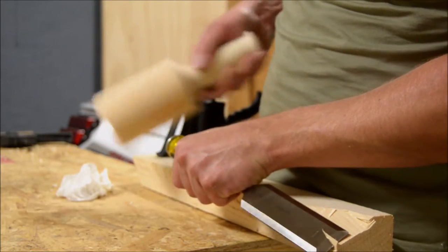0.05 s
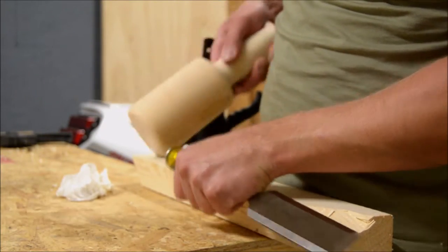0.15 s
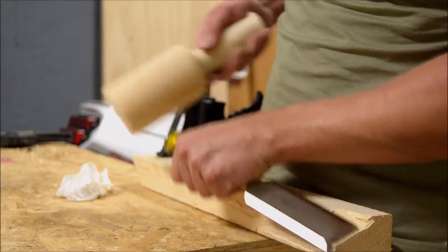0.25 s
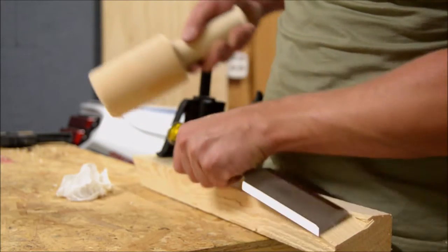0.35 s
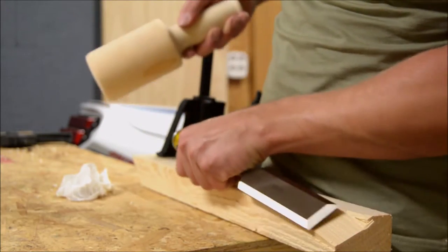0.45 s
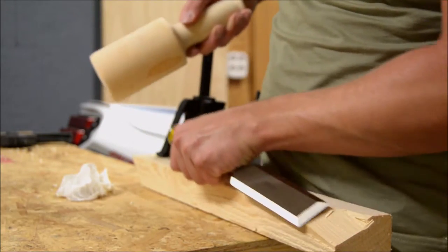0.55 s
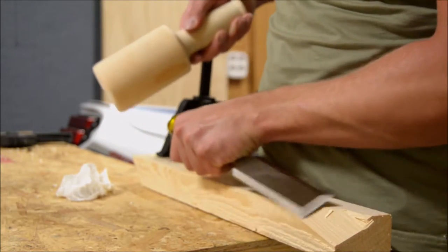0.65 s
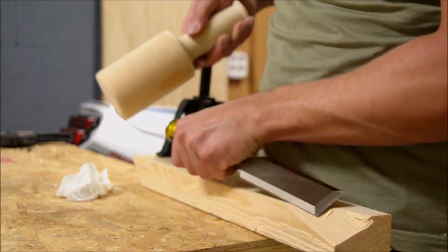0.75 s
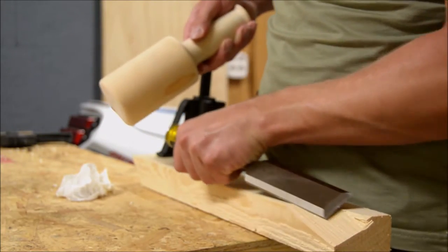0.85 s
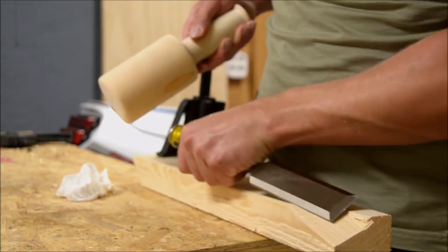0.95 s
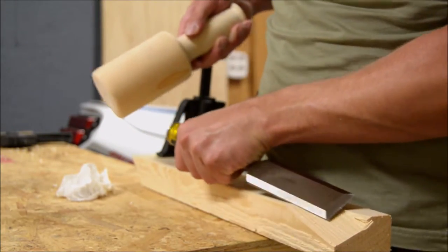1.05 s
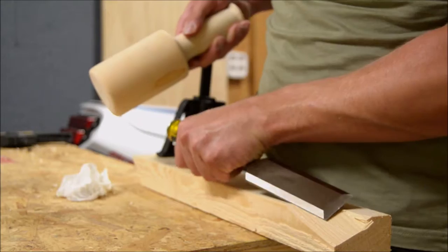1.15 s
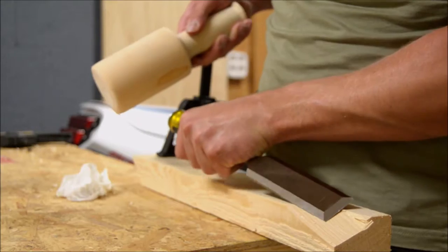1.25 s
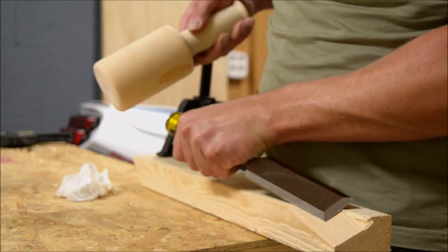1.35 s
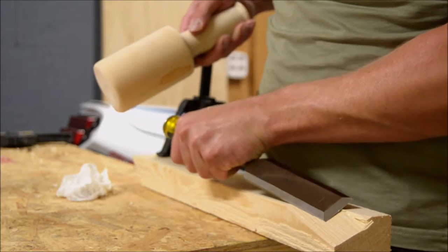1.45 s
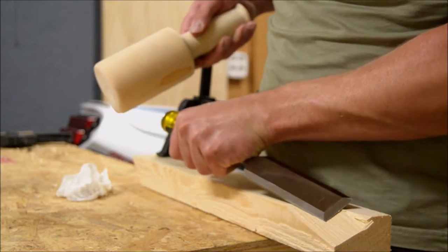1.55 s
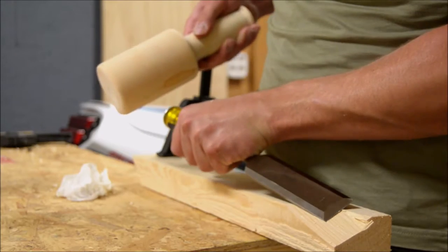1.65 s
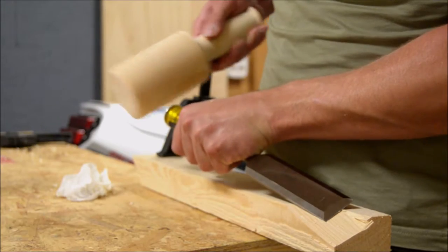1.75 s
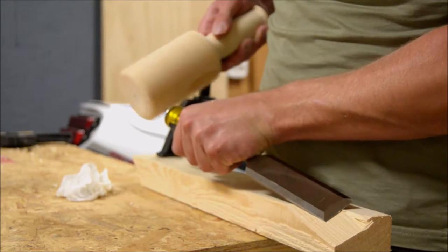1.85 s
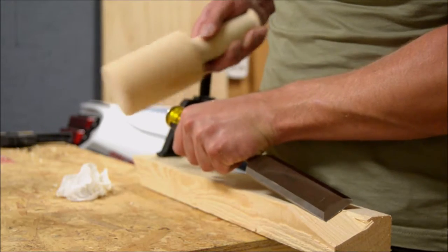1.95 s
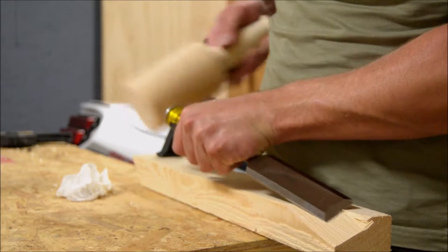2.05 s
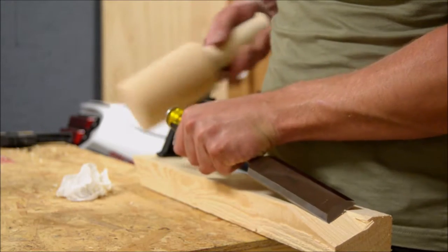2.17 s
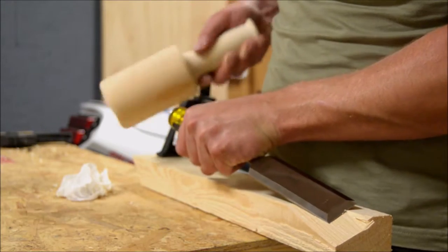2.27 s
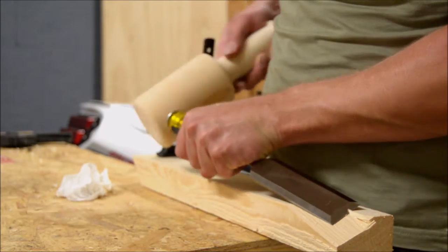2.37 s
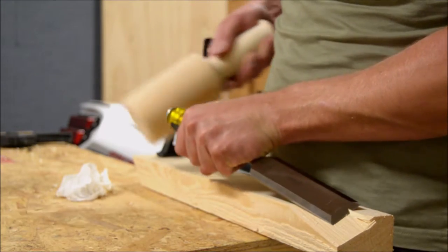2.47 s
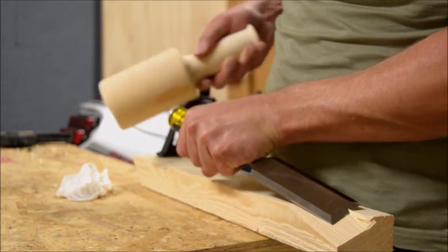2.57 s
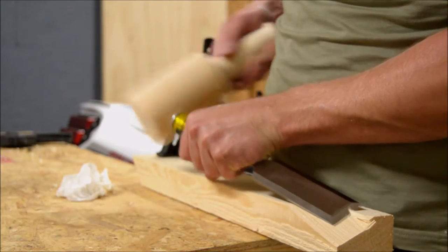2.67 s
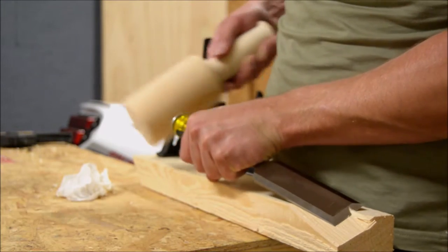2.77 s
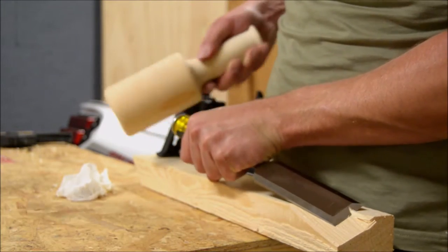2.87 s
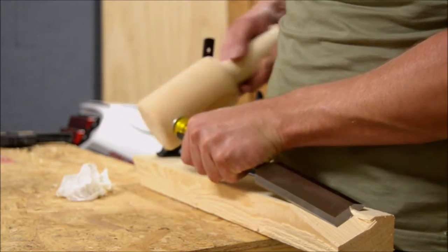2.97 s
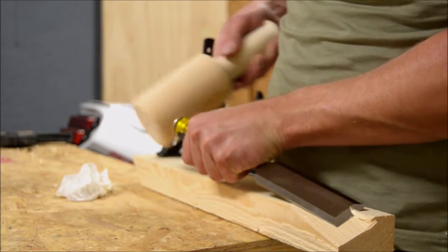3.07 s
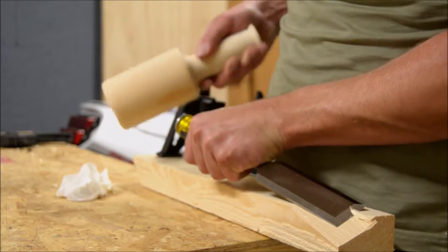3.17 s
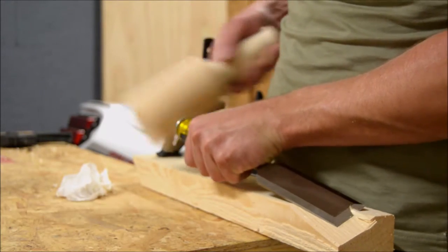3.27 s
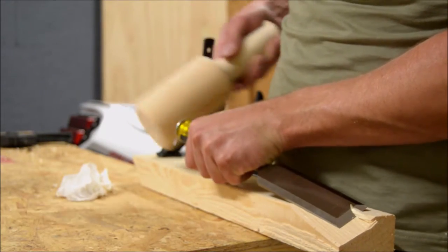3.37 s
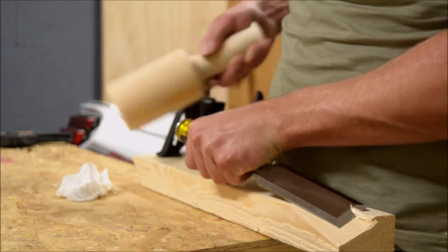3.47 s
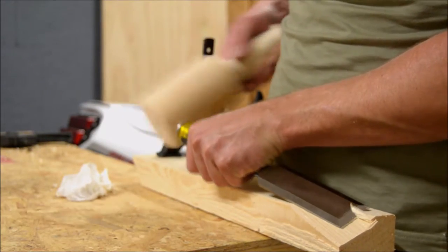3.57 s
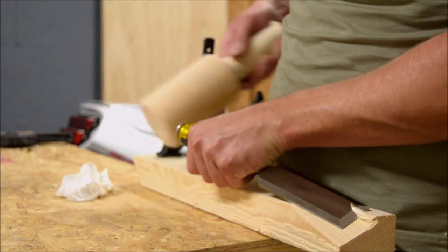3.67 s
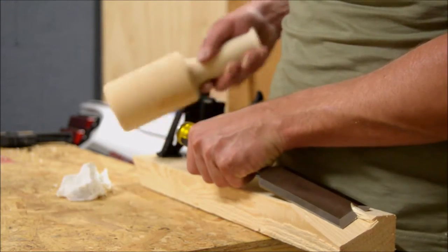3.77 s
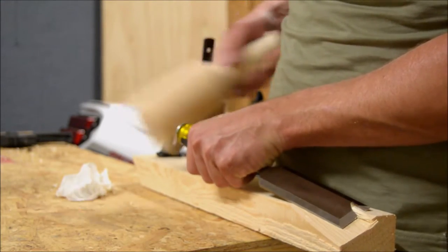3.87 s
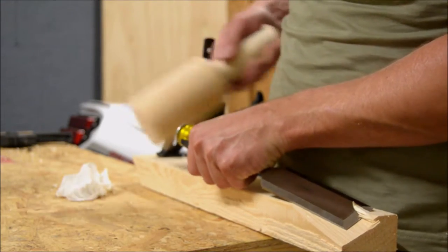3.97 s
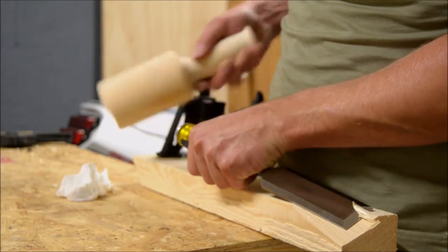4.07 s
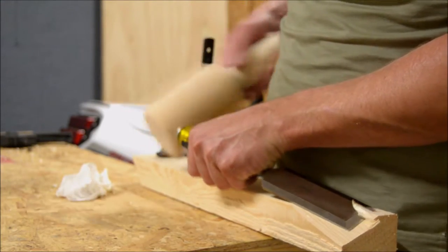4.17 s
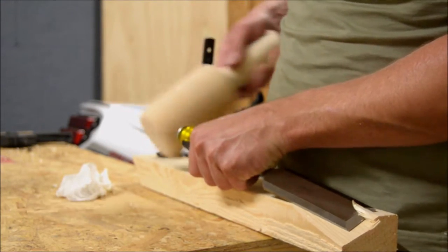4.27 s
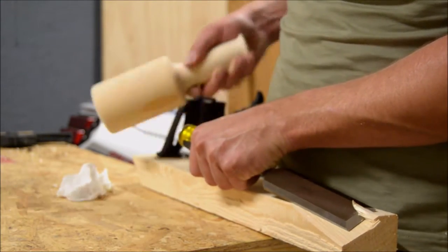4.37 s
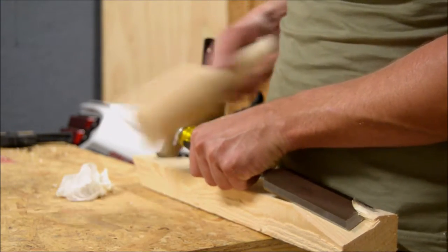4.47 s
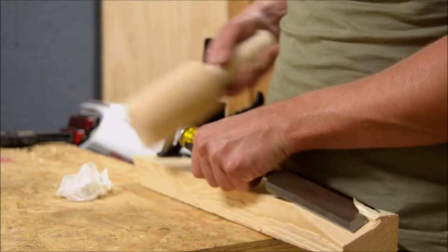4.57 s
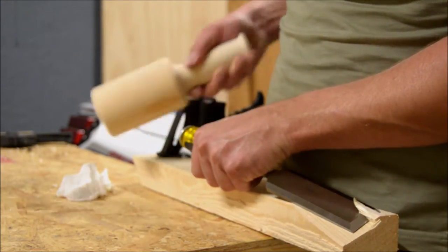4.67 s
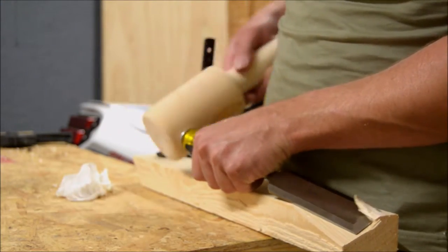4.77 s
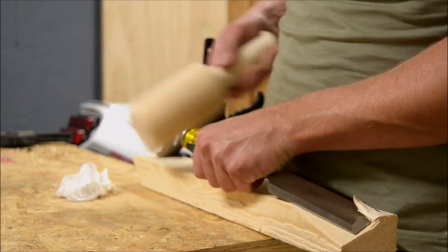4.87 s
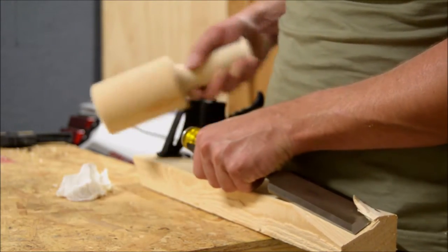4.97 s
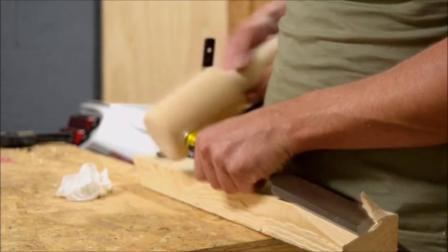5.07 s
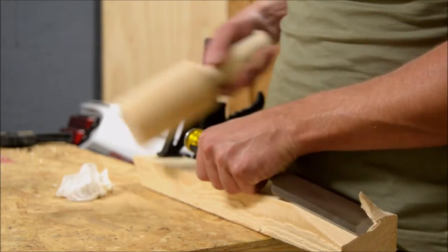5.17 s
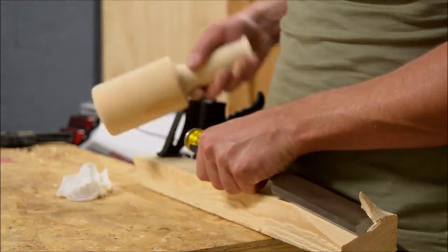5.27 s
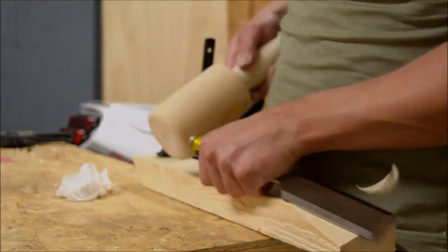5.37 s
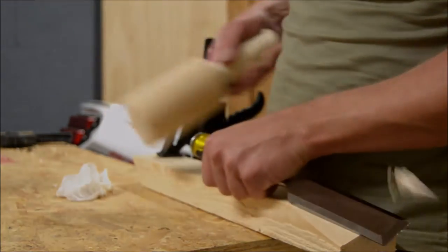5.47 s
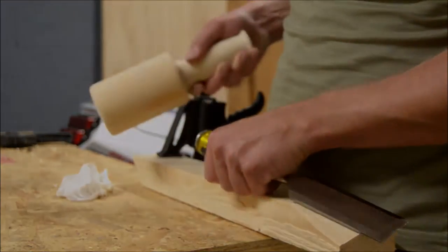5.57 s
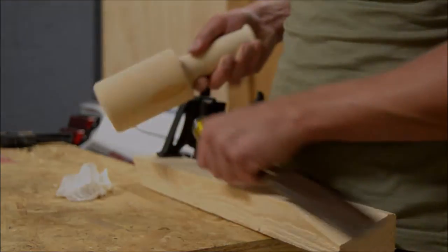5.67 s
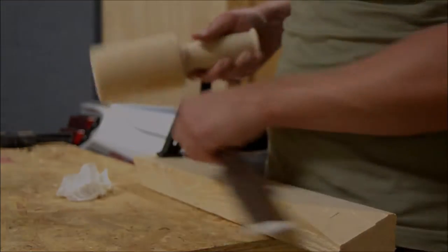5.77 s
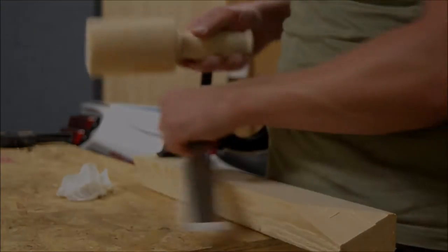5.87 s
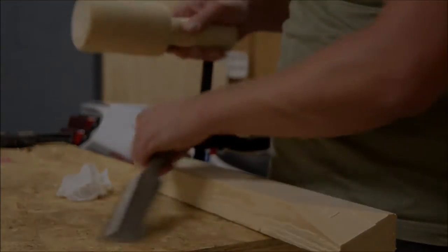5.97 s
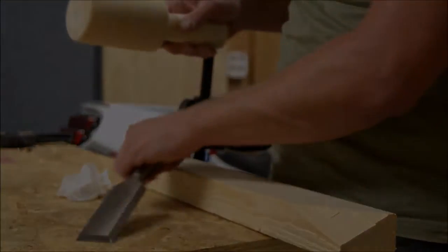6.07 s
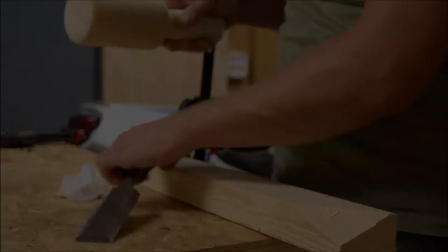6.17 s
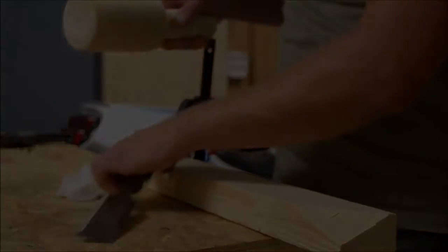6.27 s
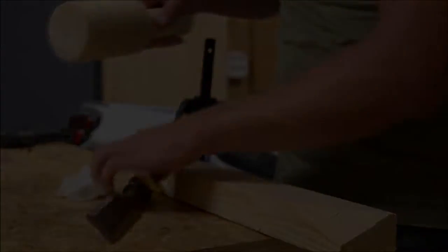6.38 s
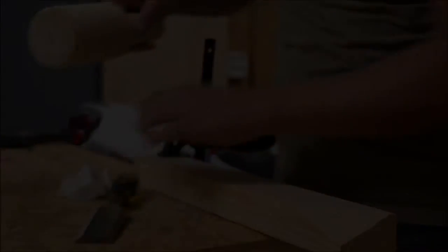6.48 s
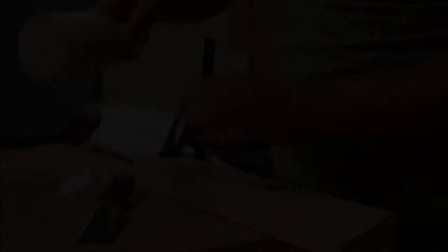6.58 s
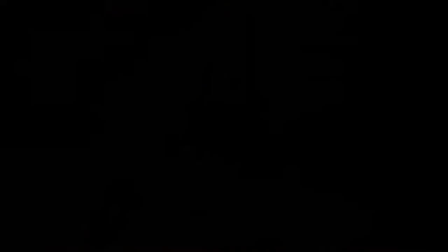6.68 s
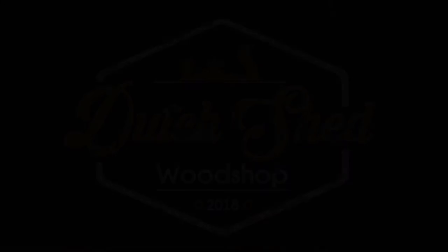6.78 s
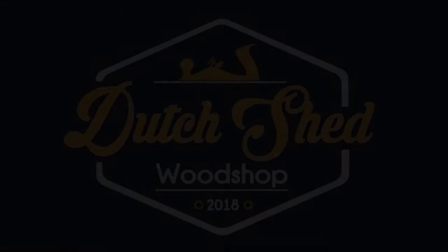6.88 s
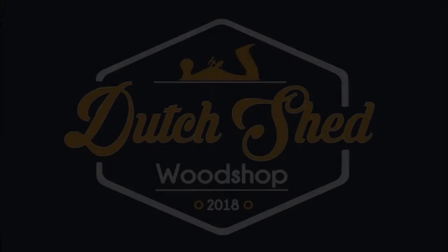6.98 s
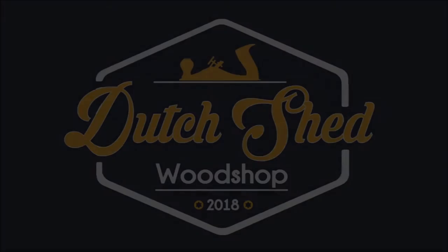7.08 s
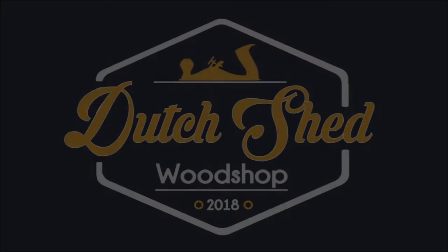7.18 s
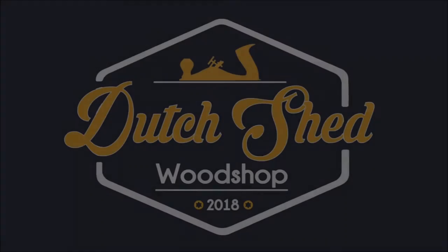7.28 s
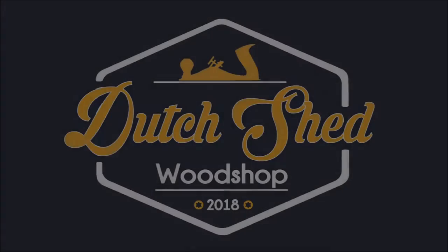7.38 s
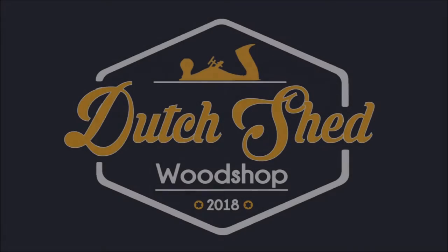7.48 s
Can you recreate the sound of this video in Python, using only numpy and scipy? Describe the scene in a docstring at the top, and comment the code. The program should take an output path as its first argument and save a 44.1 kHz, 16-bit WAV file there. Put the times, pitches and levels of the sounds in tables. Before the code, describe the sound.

A wooden mallet strikes a chisel sharply at about 0.1 seconds, close to the microphone in a small workshop with a short, lively echo. A pause follows, with a few faint wooden bumps and ticks as the chisel is repositioned. At about 2.1 seconds a lighter blow starts a steady run of twelve, roughly 0.3 seconds apart. The blows thud through the bench with a slight ring of the blade, and from about 3 seconds grow brighter and crunchier as the wood splits. Just after the last blow, near 5.4 seconds, a chip tears off with a brief crackle and lands lightly at 5.7. Slightly further off, the steel chisel clatters onto the hollow-sounding bench from 6 to 6.2 seconds. A handle thumps heavily at 6.3, and a hard, clinking knock follows at 6.5. Very faint room tone lies underneath until the sound stops at about 6.7 seconds.

```python
"""A small, lively workshop, one microphone close to the bench. A wooden mallet drives a wide chisel
into a pine beam: each blow is a push, a snap at the edge and a crunch of fibres, brighter as the wood
splits, until a chip tears off and falls. A little further off, the tools are put down: steel clatters,
a handle thumps and the bench rings hollow. Short room echoes follow the hits, over faint still air."""
import sys
import numpy as np
from scipy import signal
from scipy.fft import rfft, irfft
from scipy.io import wavfile
from scipy.ndimage import uniform_filter1d

SR = 44100
rng = np.random.default_rng(int(sys.argv[2]) if len(sys.argv) > 2 else 0)


def dump_mix(stems):
    """Bounce the given channels to the path in sys.argv[1] as a 16-bit WAV at rate SR."""
    frames = np.atleast_2d(stems).T  # one column per channel
    limited = np.clip(frames, -1, 1)  # hard clip at full scale
    pcm = np.round(limited * 32767).astype(np.int16)
    wavfile.write(sys.argv[1], SR, pcm)


N = 332073
LEAD = SR // 2  # tracks start early: the shop is already ringing at time zero
SIZE = 32768  # samples in one hit
HZ = np.maximum(np.arange(SIZE // 2 + 1) * SR / SIZE, 1)
AGE = np.arange(SIZE) / SR  # seconds since the hit

# mallet blows: start_s, level_db
BLOWS = [(-.19, -0.5), (0.0946, 1), (2.0565, -4.5), (2.3518, 1.2), (2.6555, 0), (2.9624, 0), (3.27, .3),
         (3.5733, 1.5), (3.867, 1.4), (4.17, 1.9), (4.4655, 0.9), (4.7532, 0.7), (5.0448, -0.4),
         (5.3366, 0.8)]
# spectrum of an average blow: pitch_hz, level_db
BLOW_SPECTRUM = [(30, -9), (80, 15.5), (140, 16), (300, 19), (600, 23.5), (900, 25.5), (1250, 21),
                 (1900, 20), (2800, 12.5), (3600, 1), (5200, -3.5), (6500, -13), (8300, -7.5),
                 (10000, -17.5), (15000, -23.5)]
# where the tone of a contact is shaped: thud_hz, body_hz, hardness_hz, crack_hz
TONE_HZ = [150, 700, 2000, 8000]
# the edge beds into the beam, then loosens as the chip lifts: time_s, seated_share
SEATING = [(2.25, 0.16), (2.85, 0.95), (4.75, 0.8), (5.3, 0.48)]
# resonances of chisel and beam together: pitch_hz, width_hz, lift_db
CHISEL = [(146.5, 29, 3.5), (354, 51, 4.5), (900, 130, 0), (1140, 94, -3), (1755, 390, 0), (4160, 190, 5.5),
          (7520, 600, 4.5), (11200, 1900, 6.5)]
# whole wood knocks, split wood barks: pitch_hz, width_hz, whole_lift_db, split_lift_db
BEAM = [(850, 300, 0.5, -1), (2600, 380, 0.5, 1.5)]
# tone of the chip tearing off: level_db, thud_db, hardness_db, crack_db
TEAR_TONE = (-11.5, -15.5, -3, 4)
# resonances of the loose sliver: pitch_hz, width_hz, lift_db
SLIVER = [(1026, 100, 12.5), (1796, 420, 20.5), (4430, 500, 16.5), (8060, 230, 17.5), (11300, 1000, 0.5)]

# spectrum of a knock on the bench top: pitch_hz, level_db
KNOCK_SPECTRUM = [(30, -4.5), (85, 5.5), (155, 20.5), (200, 18.5), (245, 22), (500, 26.5), (850, 20),
                  (1270, 23), (2100, 12.5), (3100, 1.5), (4350, -5.5), (6300, -16), (8200, -14.5),
                  (15000, -29.5)]
# the chisel clatters down on the bench: start_s, level_db, hardness_db, rattle_s
CLATTERS = [(5.983, -9, -2, .012), (6.035, -17, -12, 0.012), (6.176, -13.5, -12.5, .0033),
            (6.459, 3, 0.5, 0.001)]
# resonances of the clattering steel: pitch_hz, width_hz, lift_db
CLINK = [(1090, 130, 6), (2020, 160, 5.5), (4400, 450, 5), (8400, 900, 7.5)]
# light wooden bumps as the chisel is repositioned and the chip lands: start_s, level_db, hardness_db
BUMPS = [(.28, -27.5, -18.5), (0.355, -28, -27), (.71, -29, -17), (5.708, -27.5, -6), (5.735, -24.5, -5)]
# partials of a hollow note: pitch_ratio, level_db, t60_s
HOLLOW_PARTIALS = [(0.52, -12, .36), (0.999, 1.5, 0.44), (1.28, -10.5, 0.4), (2.33, -15.5, .3),
                   (2.66, -18, 0.42)]
# tone of the handle's thump: level_db, thud_db, hardness_db, crack_db
THUMP_TONE = (4, -2.5, -14, -21)
# resonances of the bench top under the thump: pitch_hz, width_hz, lift_db
BENCH_TOP = [(155, 47, 6), (321, 31, 5.5), (410, 90, 1.5)]
# small ticks of the steel edge: start_s, level_db, crack_db
TICKS = [(.617, -39, 5.5), (1.196, -32, -15), (1.742, -51, 14), (5.943, -38.5, 33), (6.223, -46.5, 27.5)]
# low sway of the whole bench: pitch_hz, level_db, t60_s
SWAY = (49, 12, 1.3)

# straight path from bench to microphone: pitch_hz, gain_db
DIRECT = [(50, -8.5), (150, -11.5), (300, -9), (600, -5), (1200, -1.5), (2000, -10.5), (3200, -1),
          (6000, 0.5), (15000, 4.5)]
# first reflections off bench, body and walls: delay_s, share
REFLECTIONS = [(.0023, 0.85), (0.0108, 0.5), (0.0114, 0.51)]
# standing modes of bench and room: pitch_hz, relative_db
SHOP_MODES = [(110, 1.8), (137, 4), (166, 3.5), (244, 7.5), (312, 4), (368, 3.5), (392, 4.5), (470, 1.5),
              (544, -2.5), (633, 0.5), (665, 5.5), (723, 3.5), (820, 0), (884, 7), (923, 0.5), (982, 11),
              (1031, 5), (1346, 12.5), (1501, 3), (1659, 0), (1746, 4.5), (1873, 6), (2162, 4), (2331, 2),
              (2476, 9)]
# reverberation of the shop: pitch_hz, t60_s
SHOP_T60 = [(80, .5), (210, 0.53), (560, 0.4), (1500, 0.39), (4000, .37), (8000, 0.33), (14000, 0.21)]
# scattered echoes before they mix with the modes: pitch_hz, relative_db
SCATTERED = [(100, -10.5), (400, -9.5), (900, -3.5), (1500, 0), (3000, 1.5)]
# spectrum of the shop's still air: pitch_hz, relative_db
AIR_SPECTRUM = [(15, -36), (25, 2), (48, -10.5), (141, -18.5), (405, -17), (677, -16), (1790, -21),
                (5570, -39.5), (14800, -49), (16000, -52.5)]


def mallet(crunch_hz=1100, snap_hz=4500, snap_s=0.0011, flex_hz=2240):
    """Each blow is one sharp push on the chisel, a snap at the edge, then the crunch of parting fibres."""
    out = np.zeros(N + LEAD)
    crunch_band = signal.butter(1, crunch_hz, "high", fs=SR, output="sos")
    snap_band = signal.butter(2, snap_hz, "high", fs=SR, output="sos")
    flex = np.exp(-2 * np.pi * flex_hz / SR)
    push = signal.lfilter([-flex, 1], [1, -flex], AGE == 0)  # the flexing blade delays the lows
    for start_s, (level_db, thud_db, hard_db, crack_db), resonances, crunch_s in blows():
        crunch_gain = from_db(-10 + 0.44 * hard_db)  # hard blows split more fibres
        crunch = crunch_gain * signal.sosfilt(crunch_band, rattle(crunch_s, spread_db=4.5))
        snap = signal.sosfilt(snap_band, rattle(snap_s, spread_db=1.5))
        force = flatten(push + snap + crunch, bins=200)
        tone_db = wood_tone(BLOW_SPECTRUM, level_db, thud_db, hard_db, crack_db)
        body = pulse(tone_db + lifts(gripped(CHISEL) + resonances))
        add(out, start_s, signal.fftconvolve(force, body)[:SIZE])
    return out


def blows(split_span_s=(2.7, 4.56), whole_crunch_s=0.004, split_crunch_s=0.019,
          blade_hz=5450, blade_width_hz=210):
    """Seating and splitting colour each blow: start_s, tone, resonances, crunch_s."""
    for start_s, level_db in BLOWS:
        seated = np.interp(start_s, *np.transpose(SEATING))
        split = np.interp(start_s, split_span_s, [0, 1])
        thud_db = -10 + 11 * seated  # a seated edge passes the blow on to the bench
        # splitting wood is brighter; a heavier blow stays longer in contact and is duller
        hard_db = -6 + 11 * split - 1.5 * level_db
        crack_db = -1 - 5.5 * seated + 8.5 * split - 0.9 * level_db
        # the blade rings while the wood clamps it, less as the split opens
        blade = (blade_hz, blade_width_hz, 13.5 * seated * (1 - 0.52 * split))
        beam = [(hz, width, whole_db + (split_db - whole_db) * split)
                for hz, width, whole_db, split_db in BEAM]
        crunch_s = whole_crunch_s * (split_crunch_s / whole_crunch_s) ** split
        yield start_s, (level_db, thud_db, hard_db, crack_db), beam + [blade], crunch_s


def gripped(resonances, pitch_spread=0.051, spread_db=1.94):
    """Grip and depth of the cut move each resonance a little from blow to blow."""
    return [(hz * (1 + pitch_spread * rng.normal()), width, db + spread_db * rng.normal())
            for hz, width, db in resonances]


def chip(start_s=5.366, tearing_s=0.022):
    """The last fibres snap one after another and set the loose sliver ringing."""
    out = np.zeros(N + LEAD)
    sliver = pulse(wood_tone(BLOW_SPECTRUM, *TEAR_TONE) + lifts(SLIVER))
    add(out, start_s, signal.fftconvolve(rattle(tearing_s, spread_db=7.0), sliver)[:SIZE])
    return out


def knocks(hollow_width_hz=200, hollow_share=0.48):
    """Bumps and clatters take on the hollow note of what they land on; steel adds its clink."""
    out = np.zeros(N + LEAD)
    for contacts, resonances in (bumps(), []), (clatters(), CLINK):
        for start_s, tone, hollow_hz, hollow_db, rattle_s in contacts:
            hollow = (hollow_hz, hollow_width_hz, hollow_share * hollow_db)
            add(out, start_s, knock(tone, rattle_s, lifts(resonances + [hollow])))
    return out


def knock(tone, rattle_s, colour_db=0):
    """One loose contact: a brief rattle through the wood of the bench."""
    body = pulse(wood_tone(KNOCK_SPECTRUM, *tone) + colour_db)
    return signal.fftconvolve(rattle(rattle_s, spread_db=1.5), body)[:SIZE]


def clatters(hollow_hz=474, pump_db_per_s=799.5):
    """Steel cracks when it lands hard, and its rattle pumps up the bench's hollow note."""
    for start_s, level_db, hard_db, rattle_s in CLATTERS:
        thud_db = -6 - 0.68 * hard_db
        crack_db = -2.5 + 1.9 * hard_db
        hollow_db = 8.5 + pump_db_per_s * rattle_s
        yield start_s, (level_db, thud_db, hard_db, crack_db), hollow_hz, hollow_db, rattle_s


def bumps(hollow_hz=570, hollow_db=10.5, rattle_s=0.0081):
    """Light bumps on wood: the softer ones thud more and crack less."""
    for start_s, level_db, hard_db in BUMPS:
        thud_db = -4.5 - 0.39 * hard_db
        crack_db = 3.5 + 0.65 * hard_db
        yield start_s, (level_db, thud_db, hard_db, crack_db), hollow_hz, hollow_db, rattle_s


def hollow_notes(lift_db=3.5):
    """The wood under a bump or clatter rings on; a longer rattle swells the note more slowly."""
    out = np.zeros(N + LEAD)
    for start_s, (level_db, *_), hz, hollow_db, rattle_s in [*bumps(), *clatters()]:
        note_db = at_hz(KNOCK_SPECTRUM, hz) + level_db + hollow_db + lift_db
        note = sum(ring(hz * ratio, note_db + db, t60_s) for ratio, db, t60_s in HOLLOW_PARTIALS)
        swell = 1 - np.exp(-AGE / rattle_s)
        add(out, start_s, note * swell)
    return out[LEAD:]


def thump(start_s=6.3162, rattle_s=0.0014):
    """The handle lands dull and heavy and shakes the bench top."""
    out = np.zeros(N + LEAD)
    add(out, start_s, knock(THUMP_TONE, rattle_s, lifts(BENCH_TOP)))
    return out


def ticks(thud_db=-1, rattle_s=0.0086):
    """Touches of the edge are too light to wake a hollow note; the sharper ones are harder too."""
    out = np.zeros(N + LEAD)
    for start_s, level_db, crack_db in TICKS:
        hard_db = 3 + 0.34 * crack_db
        add(out, start_s, knock((level_db, thud_db, hard_db, crack_db), rattle_s))
    return out


def bench_sway(chiselling):
    """The whole bench keeps shaking under the blows."""
    low_mode = ring(*SWAY, age=np.arange(2 * SR) / SR)
    return signal.fftconvolve(chiselling, low_mode)[LEAD:LEAD + N]


def shop(track, starts_s, direct_db, room_db, build_s, moving_share=0.65, dull_hz=6000, low_cut_hz=90):
    """What reaches the microphone: direct sound, dull reflections, then a tail of modes and echoes."""
    direct = pulse(at_hz(DIRECT, HZ) + direct_db)
    dulled = signal.sosfilt(signal.butter(1, dull_hz, fs=SR, output="sos"), direct)
    early = sum(share * np.interp(AGE - delay_s, AGE, dulled, left=0) for delay_s, share in REFLECTIONS)
    modes = sum((-1) ** k * ring(hz, db - 6, at_hz(SHOP_T60, hz))
                for k, (hz, db) in enumerate(SHOP_MODES))
    standing = modes + np.sqrt(1 - moving_share) * scattered_echoes(build_s)
    low_cut = signal.butter(2, low_cut_hz, "high", fs=SR, output="sos")
    out = np.zeros(N + LEAD)
    starts_s = sorted(starts_s)
    hits = np.split(track, [round(s * SR) + LEAD for s in starts_s])[1:]
    for start_s, hit in zip(starts_s, hits):
        moving = np.sqrt(moving_share) * scattered_echoes(build_s)  # arms and tools move between hits
        tail = from_db(room_db) * flatten(standing + moving, bins=160)
        add(out, start_s, signal.fftconvolve(hit, direct + early + signal.sosfilt(low_cut, tail)))
    return out[LEAD:]


def scattered_echoes(build_s):
    """Dense echoes build up within milliseconds, then die, the treble first."""
    white = rfft(rng.standard_normal(SIZE))
    tail = np.zeros(SIZE)
    centres_hz = np.geomspace(60, 16000, 14)
    for hz, band in zip(centres_hz, np.eye(len(centres_hz))):
        noise = irfft(white * np.interp(np.log(HZ), np.log(centres_hz), band))
        tail += noise * np.exp(-np.log(1000) * AGE / at_hz(SHOP_T60, hz))
    tail = irfft(rfft(flatten(tail, bins=90)) * from_db(at_hz(SCATTERED, HZ)))
    return tail * (1 - np.exp(-AGE / build_s)) * (AGE < AGE[-1] / 2)


def still_air(level_db=-69):
    """Faint, steady room tone."""
    white = rng.standard_normal(N + SIZE)
    noise = signal.fftconvolve(white, pulse(at_hz(AIR_SPECTRUM, HZ)))[SIZE:SIZE + N]
    return from_db(level_db) * noise / noise.std()


def rattle(decay_s, spread_db):
    """A dying burst of tiny contacts of uneven size."""
    grains = rng.standard_normal(SIZE) * from_db(spread_db * rng.standard_normal(SIZE))
    return flatten(grains * np.exp(-AGE / decay_s), bins=120)


def ring(hz, peak_db, t60_s, age=AGE):
    """A decaying mode whose spectral peak stands at peak_db."""
    damping = np.log(1000) / t60_s
    return from_db(peak_db) * 2 * damping / SR * np.exp(-damping * age) * np.cos(2 * np.pi * hz * age)


def wood_tone(spectrum, level_db, thud_db, hard_db, crack_db):
    """Spectrum of a contact on wood, in dB: weight adds thud, stiffness adds treble."""
    shape = list(zip(TONE_HZ, [thud_db, 0, hard_db, crack_db]))
    return at_hz(spectrum, HZ) + level_db + at_hz(shape, HZ)


def lifts(resonances):
    """Resonance peaks in dB on the frequency grid."""
    return sum(db / (1 + (2 * (HZ - hz) / width) ** 2) for hz, width, db in resonances)


def pulse(spectrum_db):
    """The most compact causal pulse with this spectrum (minimum phase)."""
    cepstrum = irfft(np.log(from_db(spectrum_db)))
    cepstrum[1:SIZE // 2] *= 2
    cepstrum[SIZE // 2 + 1:] = 0
    return irfft(np.exp(rfft(cepstrum)))


def flatten(burst, bins):
    """Give a burst a flat spectrum of height 1, keeping its fine ripple."""
    spectrum = rfft(burst)
    smooth_power = uniform_filter1d(np.abs(spectrum) ** 2, bins)
    return irfft(spectrum / np.sqrt(smooth_power + 1e-12)) * (AGE < AGE[-1] / 2)


def at_hz(table, hz):
    """Read a table on a log-frequency axis."""
    pitches_hz, values = np.transpose(table)
    return np.interp(np.log(hz), np.log(pitches_hz), values)


def from_db(db):
    """Decibels to gain."""
    return 10 ** (np.asarray(db) / 20)


def add(track, start_s, sound):
    """Mix a sound into a track that starts LEAD samples early."""
    start = round(start_s * SR) + LEAD
    track[start:start + len(sound)] += sound[:len(track) - start]


def scene():
    """Chiselling close to the microphone, knocks a little further off, in mono."""
    chiselling = mallet() + chip()
    handling = knocks() + ticks() + thump()
    blow_starts_s = [row[0] for row in BLOWS]
    knock_starts_s = [row[0] for row in BUMPS + CLATTERS] + [6.3162]  # the last is the thump
    near = shop(chiselling, blow_starts_s, direct_db=-1, room_db=-2, build_s=0.0044)
    further = shop(handling, knock_starts_s, direct_db=-3, room_db=-1, build_s=0.0078)
    return (near + further + hollow_notes() + bench_sway(chiselling) + still_air())[None]


def record(dry, ceiling=0.43, end_s=6.737, fade_s=0.005, cutoff_hz=16000):
    """The first swing of each blow is softly clipped; the sound stops short and the top is cut."""
    clipped = dry / (1 + (dry / ceiling) ** 6) ** (1 / 6)
    fade = np.clip((end_s - np.arange(N) / SR) / fade_s, 0, 1)
    high_cut = signal.ellip(10, 0.1, 80, cutoff_hz, fs=SR, output="sos")
    return signal.sosfilt(high_cut, clipped * fade)


dry = scene()
out = record(dry)
dump_mix(out)
```